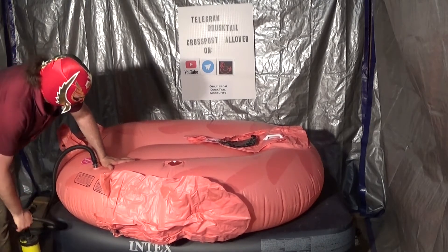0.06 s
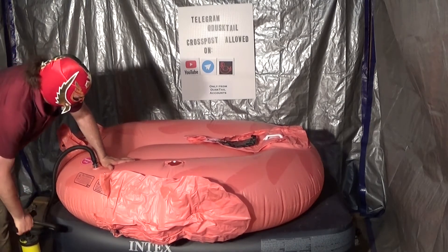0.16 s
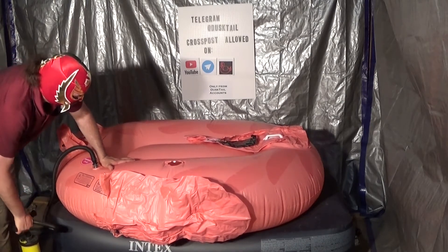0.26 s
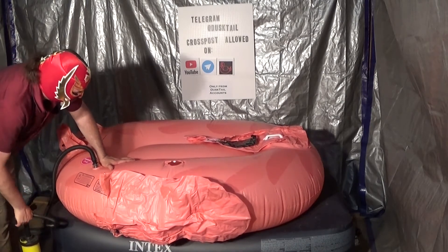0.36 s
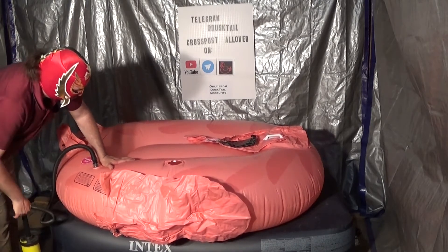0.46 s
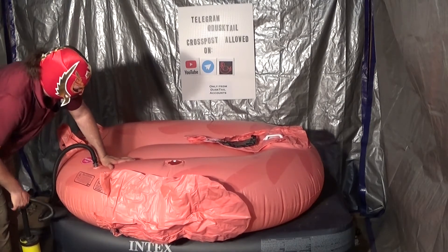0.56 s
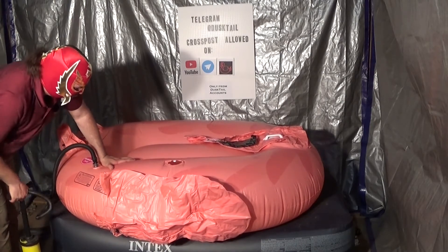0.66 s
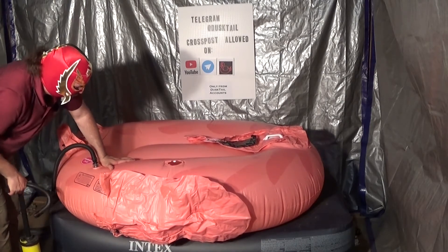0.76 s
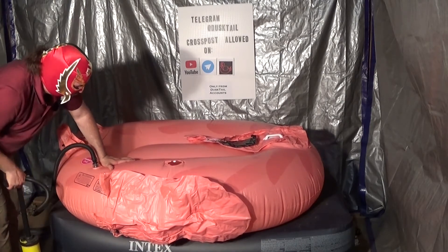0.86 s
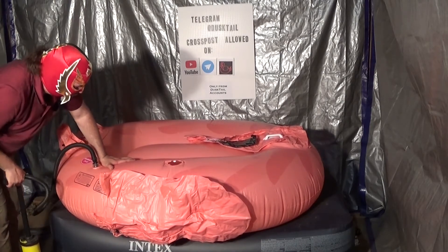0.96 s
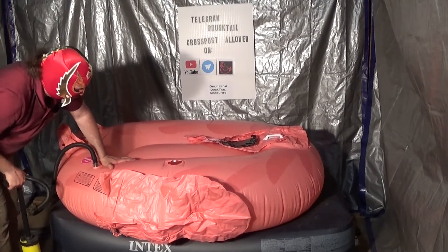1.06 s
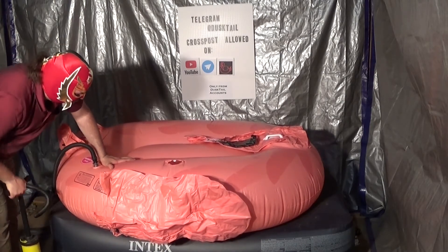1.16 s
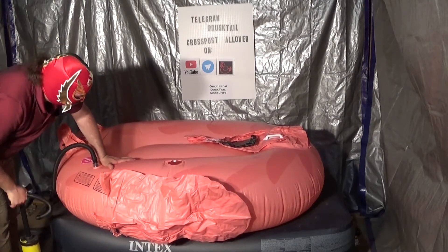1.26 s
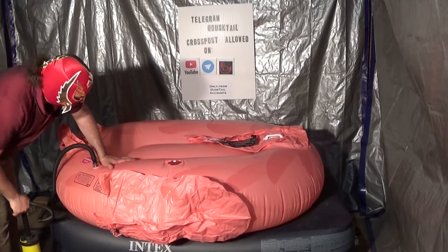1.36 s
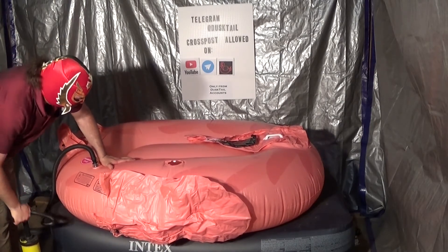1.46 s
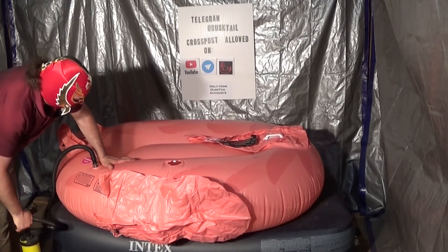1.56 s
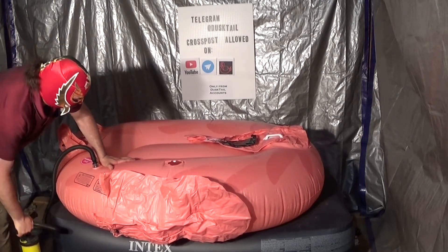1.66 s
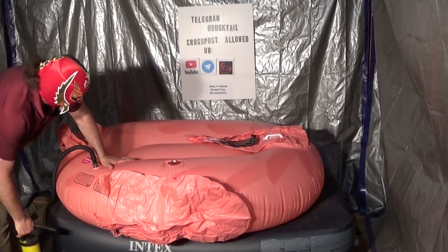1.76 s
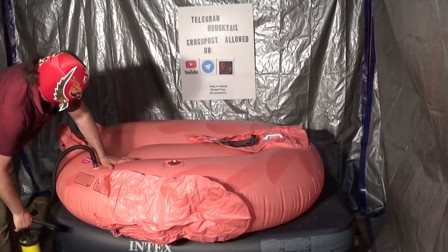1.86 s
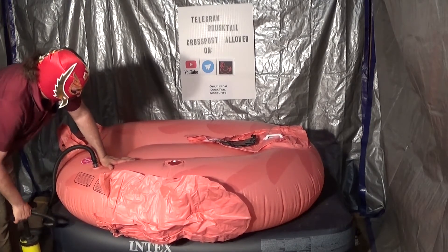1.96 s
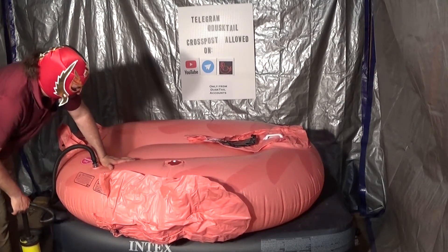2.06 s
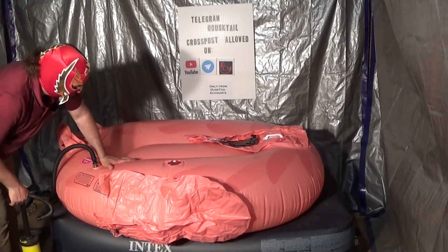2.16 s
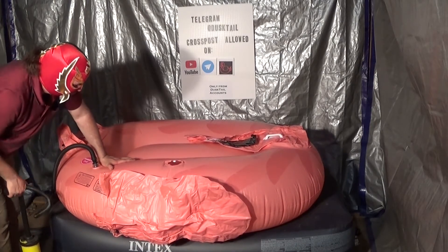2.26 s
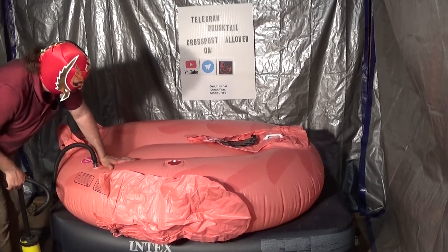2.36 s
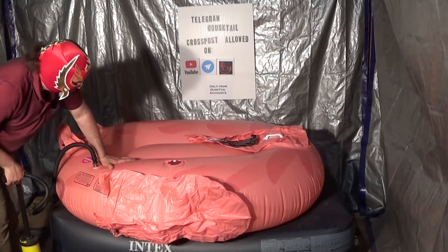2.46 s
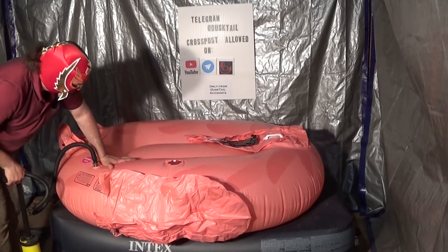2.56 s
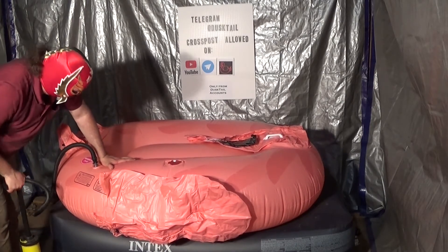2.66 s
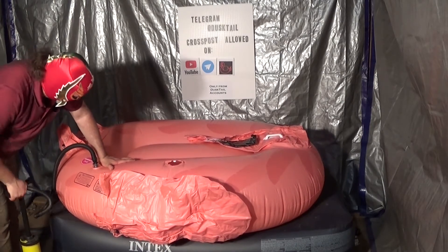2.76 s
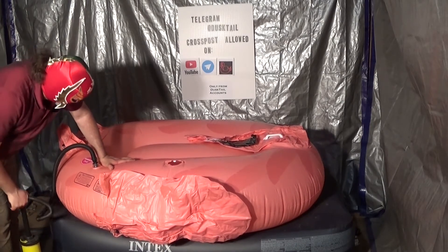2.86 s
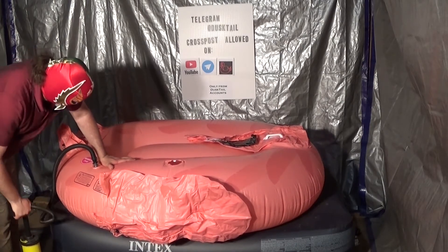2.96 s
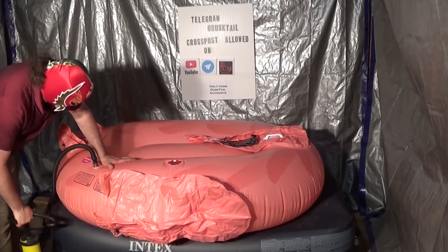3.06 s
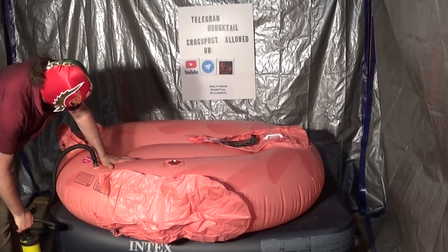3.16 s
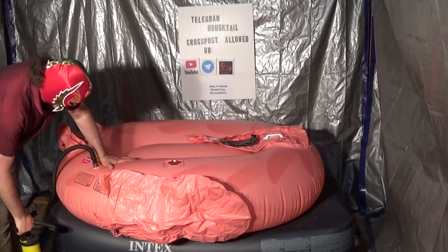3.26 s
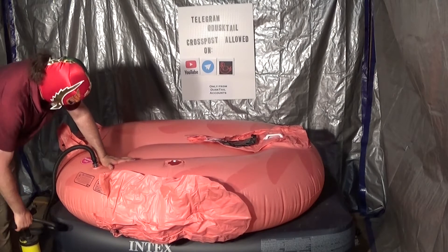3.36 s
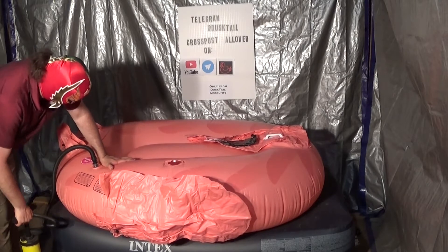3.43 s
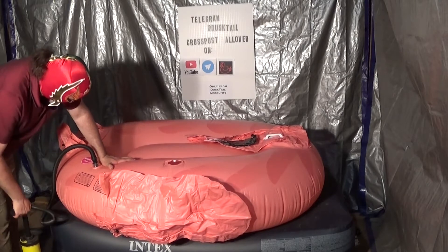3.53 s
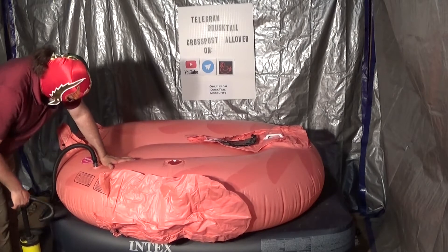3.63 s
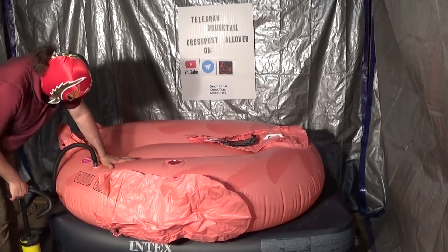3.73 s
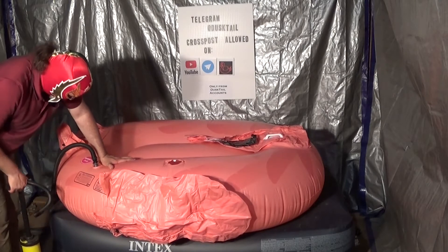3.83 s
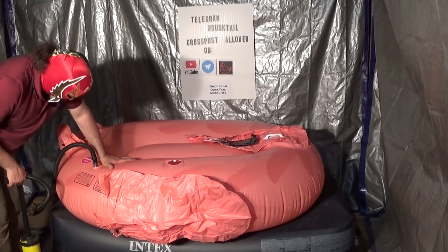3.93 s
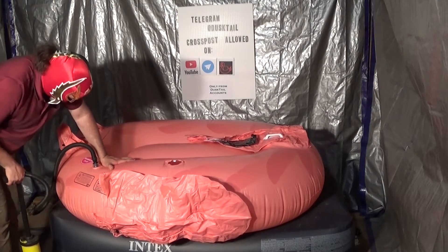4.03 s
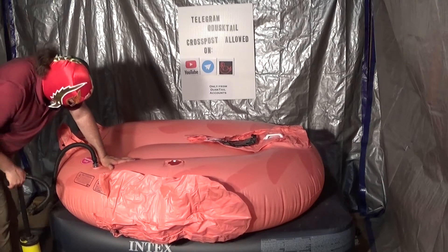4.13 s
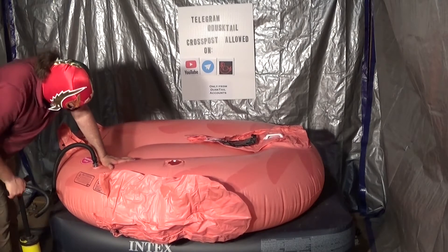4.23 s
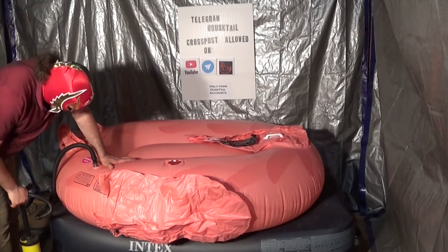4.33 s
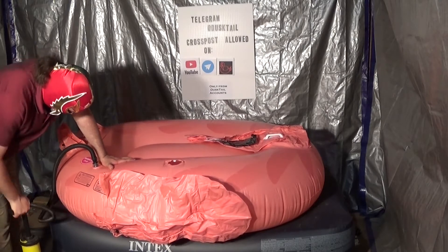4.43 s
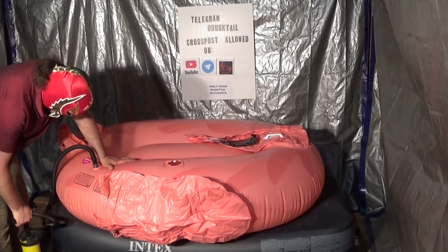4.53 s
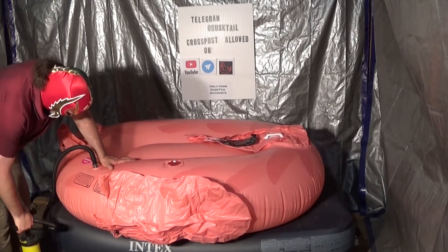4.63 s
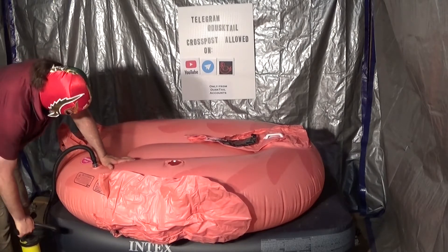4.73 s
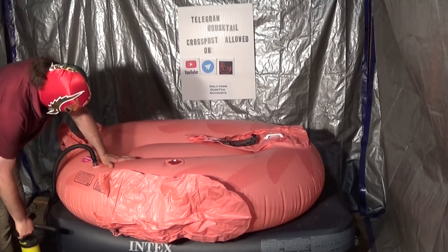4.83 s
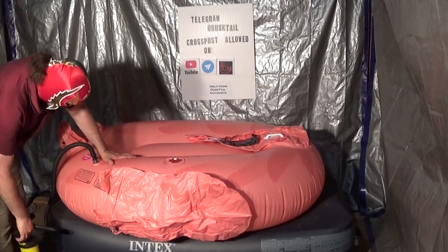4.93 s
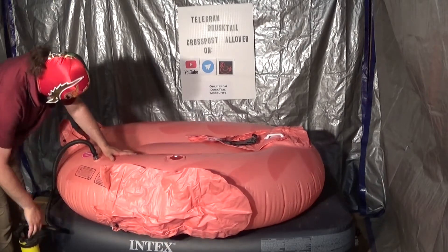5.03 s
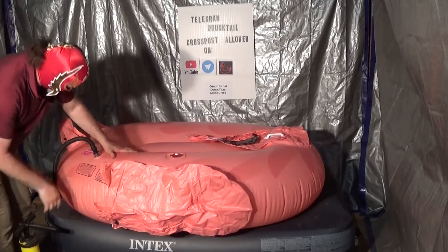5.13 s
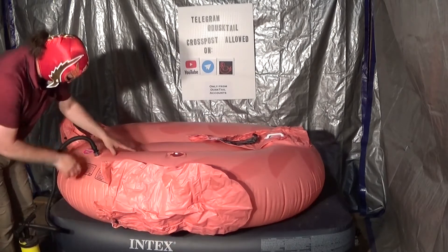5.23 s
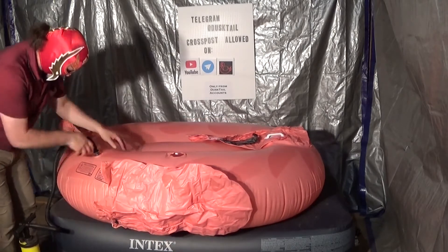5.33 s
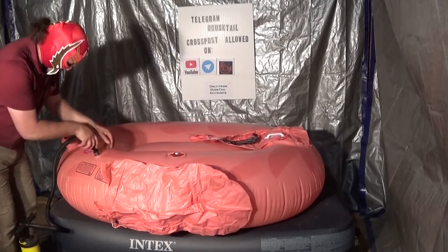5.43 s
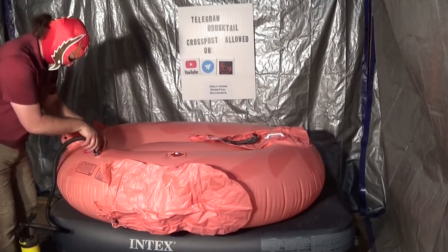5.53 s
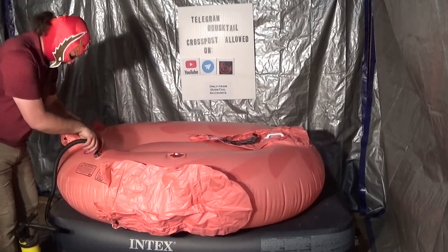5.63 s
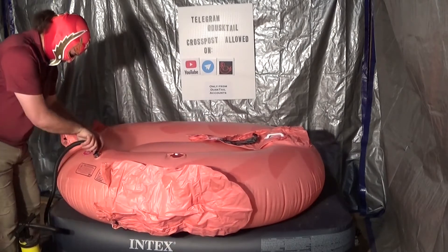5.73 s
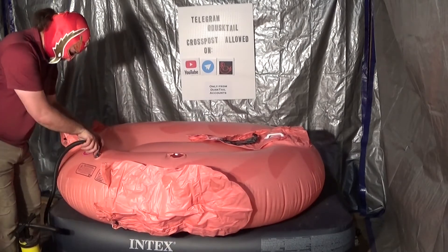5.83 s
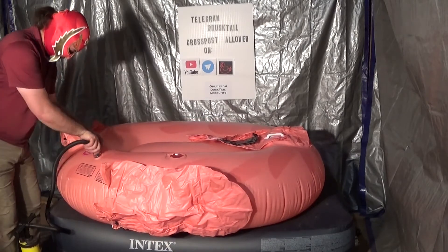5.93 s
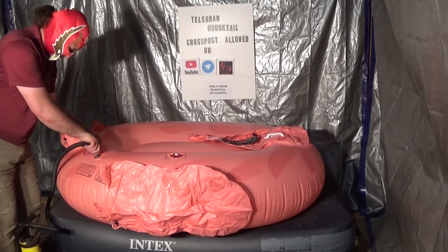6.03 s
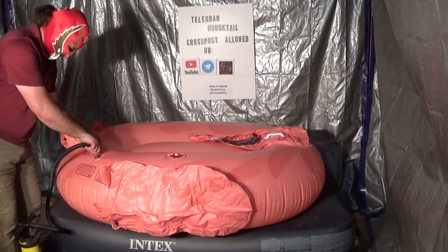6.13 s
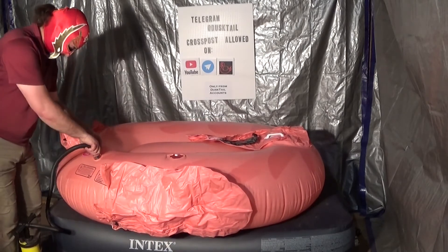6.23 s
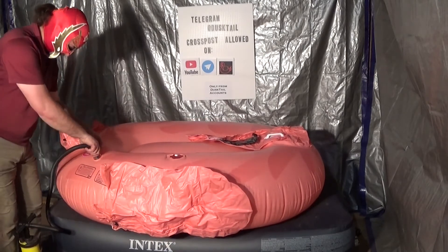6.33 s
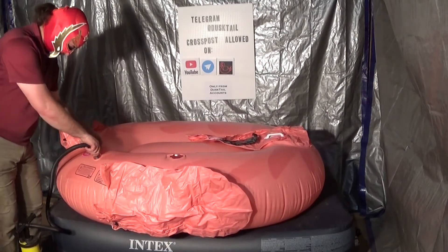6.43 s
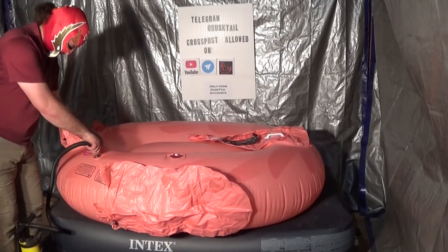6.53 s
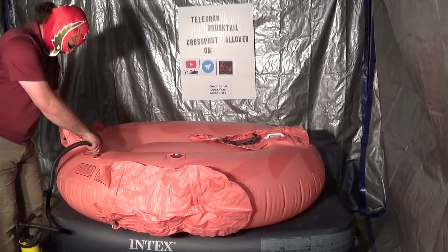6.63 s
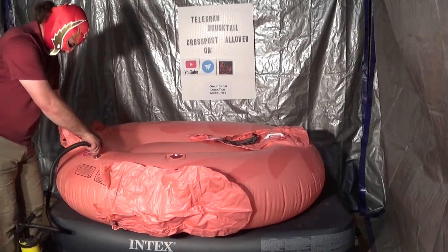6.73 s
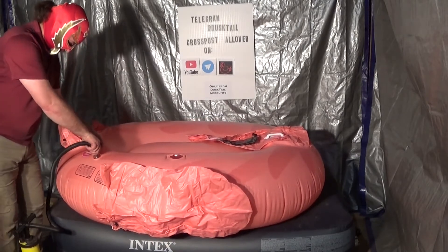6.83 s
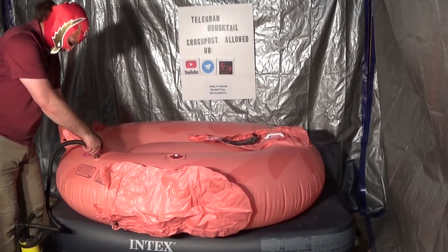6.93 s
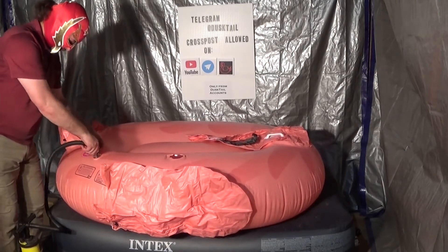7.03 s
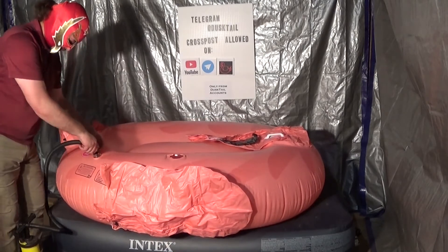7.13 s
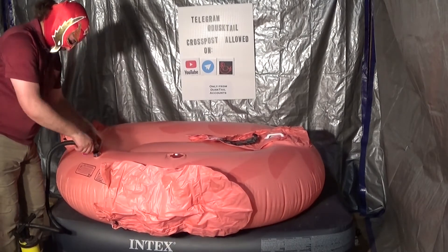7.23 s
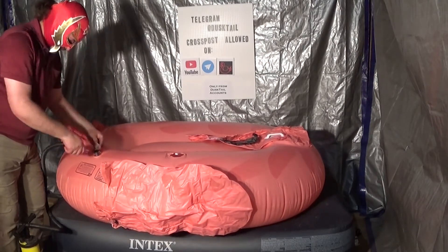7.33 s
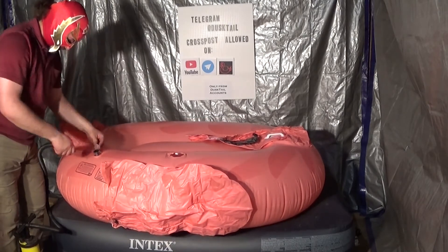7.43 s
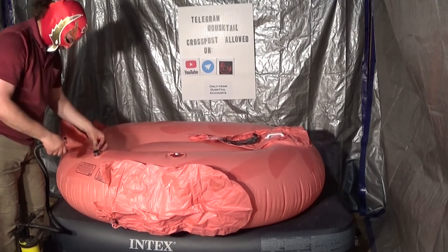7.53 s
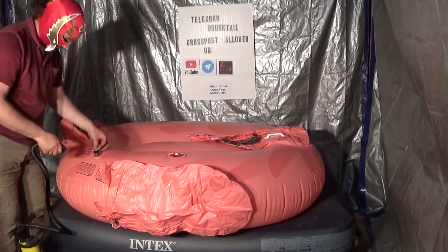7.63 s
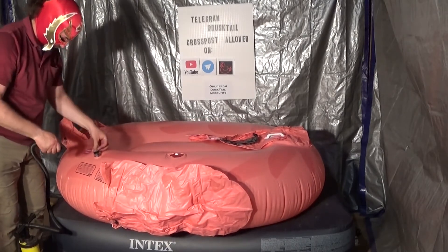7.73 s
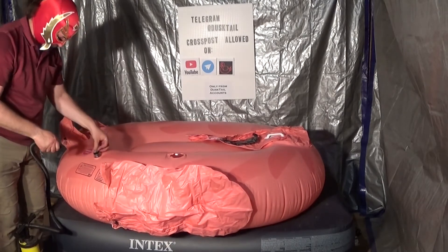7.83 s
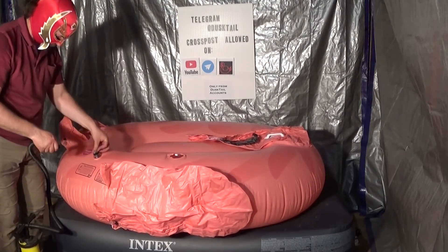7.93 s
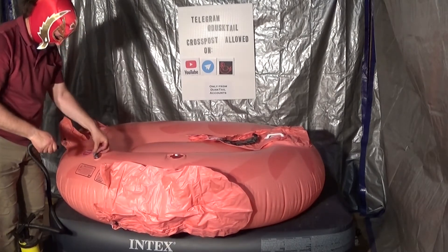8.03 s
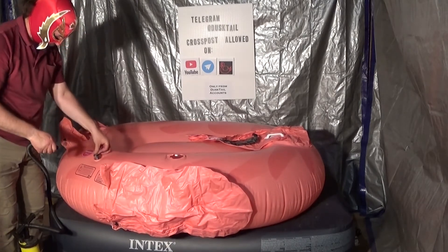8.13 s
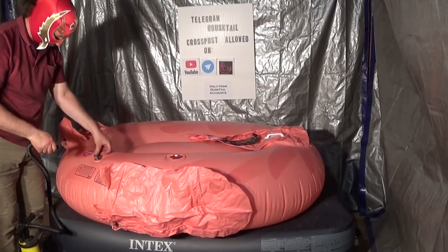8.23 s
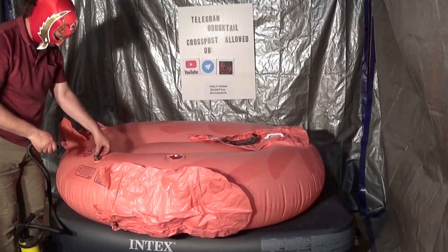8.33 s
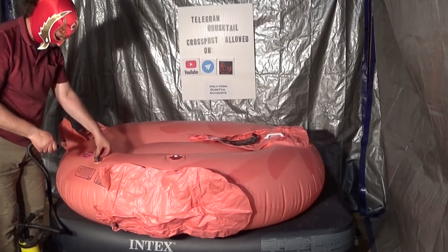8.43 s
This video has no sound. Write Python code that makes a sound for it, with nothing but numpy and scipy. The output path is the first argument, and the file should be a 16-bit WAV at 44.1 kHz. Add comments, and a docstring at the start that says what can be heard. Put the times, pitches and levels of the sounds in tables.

```python
"""Hand pump and vinyl inflatable

A double-action pump fills an inflatable in a small room hung with tarpaulin. Air rushes through valves
and hose on each pull and push; the pump bumps the floor at each turn. Then hands knock and rub the taut
vinyl and work the nozzle out, and the valve plug pops. A small fan hums faintly throughout."""
import sys
import numpy as np
from scipy import signal
from scipy.fft import rfft, irfft, next_fast_len
from scipy.io import wavfile
from scipy.ndimage import uniform_filter1d, map_coordinates

SR = 44100
rng = np.random.default_rng(int(sys.argv[2]) if len(sys.argv) > 2 else 0)


def dump(signal):
    """Clip the signal to [-1, 1] and save it as 16-bit WAV at the path in sys.argv[1]."""
    limited = np.clip(np.atleast_2d(signal).T, -1, 1)
    pcm = np.round(limited * 32767).astype(np.int16)
    wavfile.write(sys.argv[1], SR, pcm)


N = 373968
TIME = np.arange(N) / SR

# handle strokes, up and down: start_s, hold_s, flow_db
PULLS = [(0.304, .58, -17.3), (1.836, .62, -17.1), (3.371, .58, -17.3)]
PUSHES = [(-0.42, .505, -20.6), (1.124, .47, -18.3), (2.68, .455, -18.1), (4.179, .46, -17.5)]  # the first is already under way at 0 s
# valve jet spectrum on a push: freq_hz, level_db
PUSH_JET = [(700, -43), (1250, -12), (1600, -5), (2200, -5.5), (2900, -2.5), (3350, -.5), (4300, -5.5),
            (5200, -2), (6400, -0.5), (7300, -7), (8800, -11.5), (10000, -32), (15500, -50)]
# standing waves of the pump barrel: freq_hz, width_hz, lift_db
BARREL_MODES = [(1600, 150, 6.5), (1990, 80, 5), (2410, 130, 5), (2780, 100, 7.5), (3140, 150, 6.5),
                (3450, 110, 5), (3810, 75, 6.5), (4200, 70, 7), (4580, 100, 5), (4960, 70, 2.5),
                (5280, 70, 2), (5620, 60, 3)]
# spectrum of a dull, heavy contact: freq_hz, level_db
THUD_SPECTRUM = [(40, -10), (90, -12), (140, 2), (210, -2.5), (320, -7.5), (600, -28), (1500, -70)]


def amp(db):
    """Decibels to amplitude."""
    return 10 ** (np.asarray(db) / 20)


def unit(x):
    """Scale to rms 1."""
    return x / np.sqrt(np.mean(x ** 2) + 1e-20)


def along(points, hz):
    """Interpolate (freq_hz, value) points on a log axis."""
    freq_hz, values = np.transpose(points)
    return np.interp(np.log(hz + 1), np.log(freq_hz + 1), values)


def fade(t, t60_s):
    """Decay by 60 dB in t60_s."""
    return np.exp(-np.log(1000) * t / t60_s)


def onset(t, rise_s):
    """Exponential rise from 0 to 1."""
    return 1 - np.exp(-t / rise_s)


def swell(centre_s, sigma_s):
    """Bell-shaped rise and fall."""
    return np.exp(-.5 * ((TIME - centre_s) / sigma_s) ** 2)


def wobble(rate_hz):
    """Smooth random curve, rate_hz knots a second."""
    return map_coordinates(rng.standard_normal(int(N * rate_hz / SR) + 4), [TIME * rate_hz])


def filtered(x, response):
    """Apply a gain given as a function of frequency."""
    n = x.shape[-1]
    padded = next_fast_len(n + SR // 4)
    return irfft(rfft(x, padded) * response(np.fft.rfftfreq(padded, 1 / SR)), padded)[..., :n]


def noise(spectrum, resonances=()):
    """Coloured noise of rms 1, lifted at its resonances."""
    def response(f):
        lift_db = sum(db / (1 + (2 * (f - hz) / width_hz) ** 2) for hz, width_hz, db in resonances)
        return amp(along(spectrum, f) + lift_db)
    return unit(filtered(rng.standard_normal(N), response))


def ring(modes, t):
    """Damped modes of alternating sign, slightly different on every blow."""
    out = np.zeros(len(t))
    for k, (hz, db, t60_s) in enumerate(modes):
        decay = amp(db + rng.normal(0, 1)) * fade(t, t60_s)
        out += (-1) ** k * decay * np.sin(2 * np.pi * hz * rng.normal(1, .015) * t)
    return out


def add(track, start_s, sound):
    """Mix a sound in at start_s."""
    part = track[round(start_s * SR):][:len(sound)]
    part += sound[:len(part)]


def spread(pair):
    """Two unrelated signals become left and right, alike in the bass."""
    # left-right likeness of the room: freq_hz, correlation
    likeness = [(60, .998), (130, 1), (250, 0.95), (500, 0.92), (1000, 0.57), (4000, .52), (10000, 0.75)]
    angle = lambda f: np.arccos(np.clip(along(likeness, f), -1, 1)) / 2
    mid, side = filtered(pair, lambda f: np.array([np.cos(angle(f)), np.sin(angle(f))]))
    return np.array([mid + side, mid - side])


def room(x, wet_db):
    """Direct sound plus a short stereo tail from the draped walls, at unchanged power."""
    # room decay: freq_hz, t60_s
    decay_times = [(150, 0.29), (600, 0.25), (3000, 0.23), (12000, 0.26)]
    hz, t, bins = signal.stft(rng.standard_normal((2, SR // 2)), SR, nperseg=256)
    bins *= fade(t, along(decay_times, hz)[:, None])
    tail = spread(signal.istft(bins, SR, nperseg=256)[1])
    wet = signal.fftconvolve(x[None], tail / np.linalg.norm(tail[0]), axes=1)[:, :N]
    return (x + amp(wet_db) * wet) / np.hypot(1, amp(wet_db))


def background(air_db, hum_gain_db, waver_rad):
    """Room air and the slightly unsteady hum of a small fan."""
    # room air: freq_hz, level_db
    air_spectrum = [(25, -6), (45, -2), (59, 3), (80, -8), (135, -5), (200, -7), (290, -3), (400, -7),
                    (750, -5), (1200, -10), (2300, -13), (3300, -16.5), (6000, -17.5), (10000, -23.5),
                    (15000, -29)]
    # fan tones: pitch_hz, level_db
    fan_tones = [(59.2, -62), (511.4, -66), (559.9, -64.5), (818.3, -65), (1480, -70), (1970, -74.5)]
    hum = sum(amp(db + hum_gain_db) * np.sin(2 * np.pi * hz * TIME + waver_rad * wobble(7))
              for hz, db in fan_tones)
    return amp(air_db) * spread(np.array([noise(air_spectrum), noise(air_spectrum)])) + hum


def whine(level_db, pitch_hz, pulse_hz):
    """A very faint, high tone that pulses quickly."""
    pulses = np.sin(np.pi * pulse_hz * TIME) ** 10
    return amp(level_db) * pulses * np.sin(2 * np.pi * pitch_hz * TIME + wobble(20))


def rubs(grain_db):
    """Sliding hands stick and slip on the vinyl."""
    # slides: centre_s, level_db, sigma_s
    slides = [(4.83, -40, 0.077), (5.0, -45.5, .06), (5.157, -42.5, 0.046), (5.4, -46, 0.034),
              (5.92, -37.5, 0.027), (6.56, -51, .11), (6.877, -48, .03), (6.963, -47.5, 0.035),
              (7.095, -50.5, .035), (8.3, -50, .12)]
    # friction: freq_hz, level_db
    friction_spectrum = [(50, -14), (150, 5), (400, 1.5), (900, -1.5), (1600, -9.5), (5000, -11.5),
                         (9000, -16), (15000, -32)]
    pressure = sum(amp(db) * swell(centre_s, sigma_s) for centre_s, db, sigma_s in slides)
    return pressure * unit(noise(friction_spectrum) * amp(grain_db * wobble(400)))


def knocks(skin_gain_db, crease_gain_db, thud_gain_db):
    """A touch sets off the dense, hollow modes of the inflatable and snaps a crease."""
    # hand and nozzle contacts: start_s, skin_db, crease_db, thud_db
    contacts = [(5.121, -31.5, -55, -48), (5.243, -32.5, -53, -50), (5.33, -25.5, -67, -46),
                (5.352, -33, -45.5, -48), (5.505, -38.5, -56, -52), (5.968, -35.5, -50, -49),
                (6.145, -35, -48, -68), (6.391, -33.5, -41.5, -59), (6.44, -37.5, -45, -62),
                (6.506, -37, -51, -61), (6.634, -36.5, -51, -61), (6.808, -37, -56.5, -56),
                (6.874, -44, -46, -52), (6.959, -35.5, -48, -46), (7.541, -32, -46.5, -62),
                (8.127, -26, -44, -47), (8.331, -40, -53, -60), (8.447, -40, -58, -62)]
    # air-filled skin and its creases: freq_hz, level_db
    skin_spectrum = [(50, -35), (140, -5), (250, -8), (380, .5), (550, -2), (800, -5), (1100, -11.5),
                     (1700, -21), (3000, -38), (8000, -60)]
    crease_spectrum = [(500, -30), (1500, -8.5), (2400, 9.5), (4000, 6), (7000, 1.5), (10500, -2),
                       (15000, -31)]
    skin, crease, thud = np.zeros((3, N))
    t = np.arange(SR // 2) / SR
    body = onset(t, rise_s=.00063) * fade(t, t60_s=.14)
    for start_s, skin_db, crease_db, thud_db in contacts:
        add(skin, start_s, amp(skin_db + skin_gain_db) * body)
        add(thud, start_s, amp(thud_db + thud_gain_db) * body)
        add(crease, start_s, amp(crease_db + crease_gain_db) * fade(t, t60_s=.099))
    hollow = skin * noise(skin_spectrum) + thud * noise(THUD_SPECTRUM)
    crackle = unit(noise(crease_spectrum) * amp(5.6 * wobble(1500)))
    return hollow + crease * crackle


def plug_pop(ring_gain_db, crack_gain_db, crack_t60_s):
    """The valve plug snaps over and the air behind it rings."""
    # plug snap: start_s, level_db
    snaps = [(5.667, -14)]
    # air behind the plug: pitch_hz, level_db, t60_s
    cavity_modes = [(145, -20, 0.19), (242, -11, 0.11), (303, -6, 0.084), (382, -4, 0.13), (453, -3.5, .15),
                    (540, -1.5, 0.13), (591, -9, 0.14), (673, -7.5, 0.11), (765, -8, 0.12),
                    (904, -12, 0.054), (1040, -11, 0.073), (1430, -28, .06), (1640, -17, 0.042)]
    # crack of the plug: freq_hz, level_db
    crack_spectrum = [(300, 1), (1500, 2.5), (2500, -8.5), (4800, -8.5), (6200, -1.5), (7300, -4.5),
                      (8800, -1.5), (10300, 0), (12000, -14.5), (15000, -22)]
    cavity, crack = np.zeros((2, N))
    t = np.arange(SR // 2) / SR
    for start_s, db in snaps:
        add(cavity, start_s, amp(db + ring_gain_db) * ring(cavity_modes, t))
        add(crack, start_s, amp(db + crack_gain_db) * fade(t, crack_t60_s))
    return cavity + crack * noise(crack_spectrum)


def floor_bumps(ring_gain_db, thud_gain_db, rock_db, rock_lead_s, floor_db):
    """Each reversal jolts and rings the pump's foot; before a push it rocks, then leans on the floor."""
    # stroke reversals: start_s, level_db, rise_s
    turns = [(0.292, -30, 0.004), (1.117, -28, 0.004), (1.832, -29.5, 0.0036), (2.673, -23, 0.004),
             (3.356, -31, 0.0034), (4.175, -24, 0.004), (4.974, -30.5, 0.004)]
    # pump on the floor: pitch_hz, level_db, t60_s
    foot_modes = [(131, 0.5, 0.36), (156.8, 2.5, .3), (186, -7.5, 0.28), (234, -10.5, 0.087),
                  (325, -1, 0.11), (555, -6.5, 0.65)]
    # floor under the weight of a push: freq_hz, level_db
    floor_spectrum = [(18, -4), (35, -3), (48, -14), (80, 0), (105, -12), (140, 2), (250, -30), (600, -70)]
    foot, jolt, weight = np.zeros((3, N))
    t = np.arange(SR) / SR
    for start_s, db, rise_s in turns:
        add(foot, start_s, amp(db + ring_gain_db) * ring(foot_modes, t) * onset(t, rise_s))
        add(jolt, start_s, amp(db + thud_gain_db) * fade(t, t60_s=.24) * onset(t, rise_s))
    for start_s, _, _ in PUSHES[1:]:
        add(foot, start_s - rock_lead_s, amp(rock_db) * ring(foot_modes, t) * onset(t, rise_s=.0094))
        add(weight, start_s, amp(floor_db) * fade(t, t60_s=.48) * onset(t, rise_s=.011))
    return foot + jolt * noise(THUD_SPECTRUM) + weight * noise(floor_spectrum)


def hose_whistles(gain_db, jitter_rad):
    """Airy, unsteady tones shed by the ribs of the hose early in every stroke."""
    # rib tones: delay_s, pitch_hz, level_db, sigma_s
    pull_tones = [(.045, 2790, -22.5, .023), (.05, 3330, -26, .022)]
    push_tones = [(.03, 3320, -29, .018), (.12, 3250, -25.5, .031)]
    jitter = jitter_rad * wobble(130)
    flicker = unit(amp(5 * wobble(90)))
    out = np.zeros(N)
    for strokes, tones in ((PULLS, pull_tones), (PUSHES, push_tones)):
        for delay_s, hz, db, sigma_s in tones:
            bursts = sum(swell(start_s + delay_s, sigma_s) for start_s, _, _ in strokes)
            out += amp(db + gain_db) * bursts * np.sin(2 * np.pi * hz * TIME + jitter)
    return flicker * out


def valve_flap(spit_db, spit_delay_s, seep_gain_db, seep_lead_s):
    """Air seeps past the flap, which snaps open with a bright spit as a push begins."""
    spit = np.zeros(N)
    t = np.arange(SR // 4) / SR
    for start_s, _, _ in PUSHES[1:]:
        add(spit, start_s + spit_delay_s, amp(spit_db) * fade(t, t60_s=.16))
    seep = sum(amp(db + seep_gain_db) * swell(start_s - seep_lead_s, seep_lead_s)
               for start_s, _, db in PUSHES)
    return (spit + seep) * noise(PUSH_JET, BARREL_MODES)


def turbulence(x, depth_db):
    """Turbulence favours now one standing wave, now another, at steady total power."""
    bins = signal.stft(x, nperseg=1024)[2]
    patches = uniform_filter1d(rng.standard_normal(bins.shape), size=3, axis=0)
    patches = uniform_filter1d(patches, size=9, axis=1)
    patchy = bins * amp(depth_db * unit(patches))
    patchy *= np.linalg.norm(bins, axis=0) / (np.linalg.norm(patchy, axis=0) + 1e-12)
    return unit(signal.istft(patchy, nperseg=1024)[1][:N])


def flow_envelope(t, hold_s, level_db, attack_s, swell_db_per_s, release_db_per_s):
    """Flow builds up, runs with the piston and dies as the arm slows into the turn."""
    ease_s, stop_s = .035, .27  # the piston rests stop_s after the hold ends
    slowing_s = ease_s * np.logaddexp(0, (t - hold_s) / ease_s)
    cutoff = np.exp(-np.maximum(t - hold_s - stop_s, 0) / ease_s)
    flow_db = level_db + swell_db_per_s * (t - slowing_s) - release_db_per_s * slowing_s
    return onset(t, attack_s) * cutoff * amp(flow_db)


def airflow(strokes, jet_spectrum, hose_spectrum, shapes, flutter_db):
    """Air jets through a flap valve, rings the barrel and rushes down the hose."""
    # treble fizz: freq_hz, level_db
    fizz_spectrum = [(3000, -37), (7000, -3.5), (8700, 1), (10500, -4), (12500, -13), (15500, -25.5)]
    layers = dict(jet=turbulence(noise(jet_spectrum, BARREL_MODES), depth_db=1.5),
                  hose=noise(hose_spectrum),
                  fizz=noise(fizz_spectrum, BARREL_MODES))
    out = np.zeros(N)
    for start_s, hold_s, db in strokes:
        on = TIME >= start_s
        for name, sound in layers.items():
            out[on] += amp(db) * flow_envelope(TIME[on] - start_s, hold_s, *shapes[name]) * sound[on]
    # the flap trembles in the turbulent stream
    return out * amp(flutter_db * wobble(60) + .35 * wobble(300))


def pull_strokes():
    """The handle rises: the rush of air builds gently and stays nearly level."""
    # valve jet and hose rush: freq_hz, level_db
    jet_spectrum = [(700, -56), (1250, -16), (1600, -8), (2200, -4.5), (2900, -1.5), (3350, -1),
                    (4300, -4.5), (5200, -2), (6200, 0), (7000, -4.5), (8200, -12), (10000, -22.5),
                    (12500, -28), (15500, -42)]
    hose_spectrum = [(30, -24.5), (130, -12), (250, -13), (350, -1.5), (550, -3), (780, 1), (970, -8),
                     (1120, -2), (1300, -7.5), (2000, -16), (4000, -60)]
    # envelope per layer: level_db, attack_s, swell_db_per_s, release_db_per_s
    shapes = dict(jet=(.7, .055, -1.2, 160), hose=(-20, .025, 1, 100), fizz=(-23.3, .13, 0, 120))
    return airflow(PULLS, jet_spectrum, hose_spectrum, shapes, flutter_db=.33)


def push_strokes(sag_db, sag_delay_s, sag_sigma_s):
    """The handle goes down: air starts sharply and sags briefly once the first pressure is spent."""
    # hose rush: freq_hz, level_db
    hose_spectrum = [(30, -26), (130, -11), (250, -13), (340, 0), (450, -2.5), (560, 2), (680, -3),
                     (970, -7), (1120, -3.5), (1300, -9.5), (2000, -18), (4000, -60)]
    # envelope per layer: level_db, attack_s, swell_db_per_s, release_db_per_s
    shapes = dict(jet=(-.1, .012, 0, 108), hose=(-22.3, .008, 23, 115), fizz=(-18.2, .01, 12, 102))
    sag = sum(swell(start_s + sag_delay_s, sag_sigma_s) for start_s, _, _ in PUSHES)
    return amp(sag_db * sag) * airflow(PUSHES, PUSH_JET, hose_spectrum, shapes, flutter_db=.43)


def scene():
    """Pump and vinyl slightly to the left in the room, over floor bumps and background."""
    pulls = pull_strokes()
    pushes = push_strokes(sag_db=-3.5, sag_delay_s=.068, sag_sigma_s=.026)
    pushes += valve_flap(spit_db=-26.5, spit_delay_s=.007, seep_gain_db=-18, seep_lead_s=.015)
    pump = room(pulls, wet_db=-2) + room(pushes, wet_db=-2)
    pump += room(hose_whistles(gain_db=.5, jitter_rad=1.6), wet_db=-1)
    vinyl = knocks(skin_gain_db=-4.5, crease_gain_db=2.5, thud_gain_db=5.5) + rubs(grain_db=2.5)
    vinyl += plug_pop(ring_gain_db=-5.5, crack_gain_db=-16, crack_t60_s=.22)
    mix = pump * amp([[.7], [-.7]]) + room(vinyl, wet_db=-3) * amp([[.5], [-.5]])
    mix += floor_bumps(ring_gain_db=-12, thud_gain_db=-9.5, rock_db=-43.5, rock_lead_s=.06,
                       floor_db=-31.5)
    mix += background(air_db=-54.5, hum_gain_db=3.5, waver_rad=.96)
    return mix + whine(level_db=-63.5, pitch_hz=3820, pulse_hz=30)


def record(dry):
    """Brick-wall low-pass at 15.5 kHz."""
    return filtered(dry, lambda hz: hz < 15500)


dry = scene()
out = record(dry)
dump(out)
```